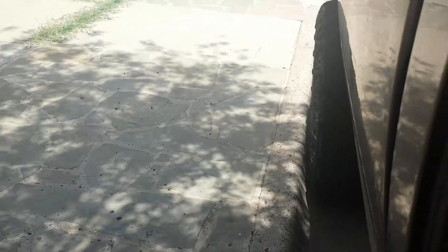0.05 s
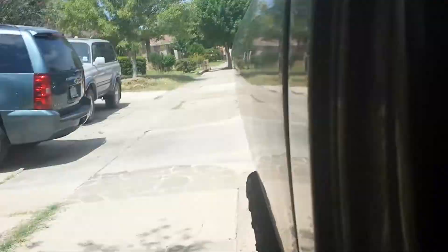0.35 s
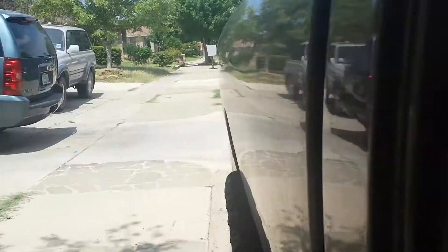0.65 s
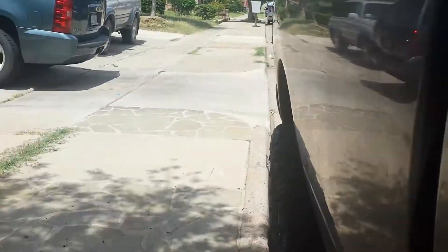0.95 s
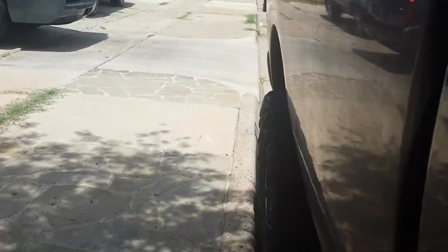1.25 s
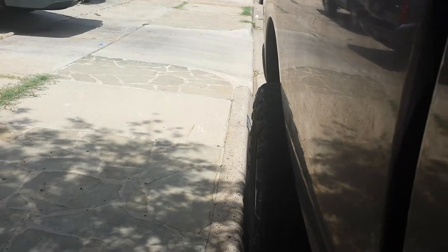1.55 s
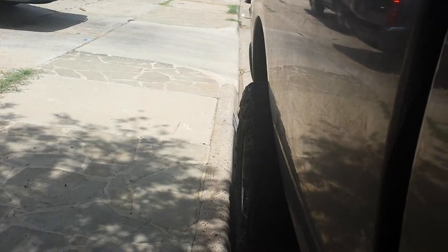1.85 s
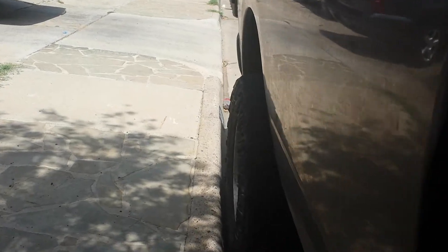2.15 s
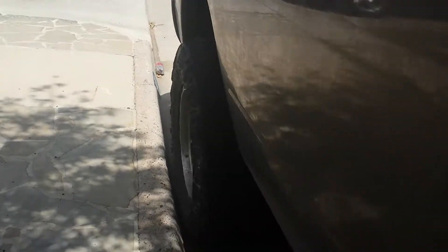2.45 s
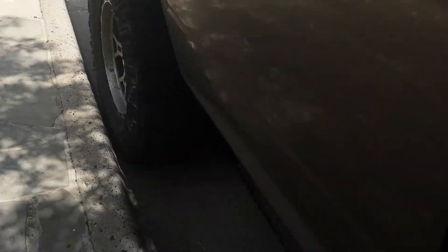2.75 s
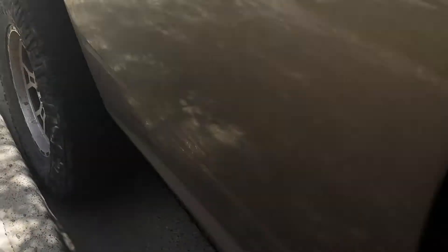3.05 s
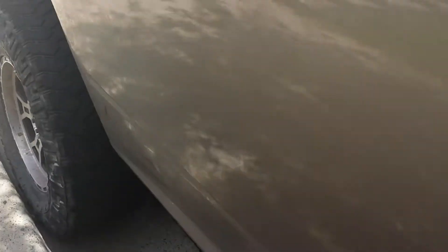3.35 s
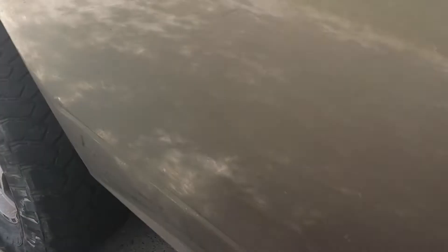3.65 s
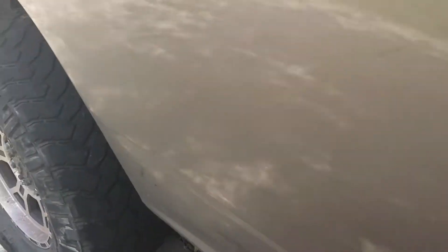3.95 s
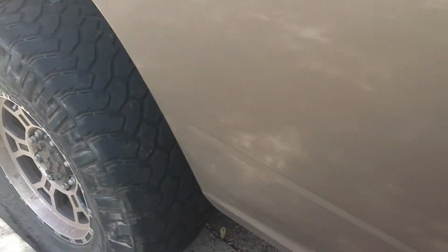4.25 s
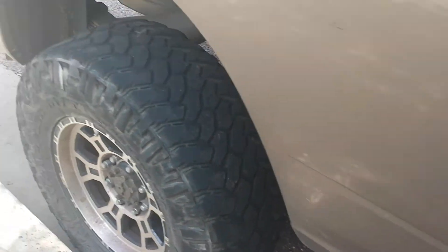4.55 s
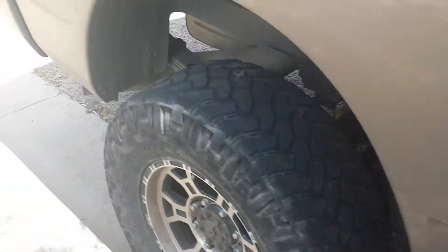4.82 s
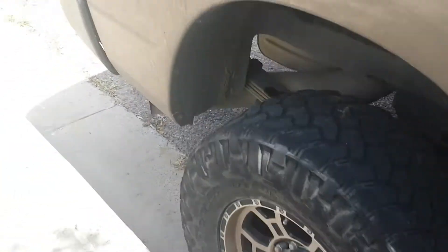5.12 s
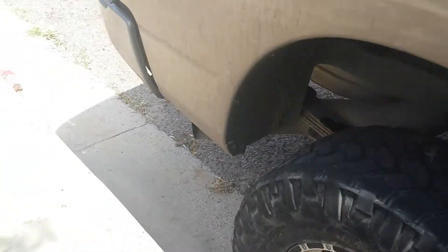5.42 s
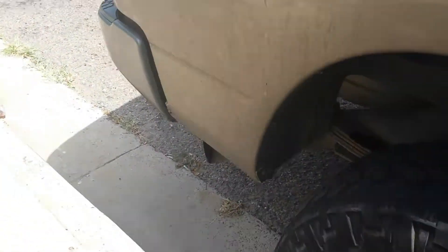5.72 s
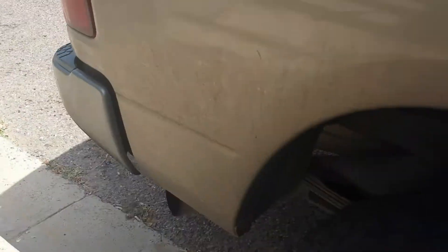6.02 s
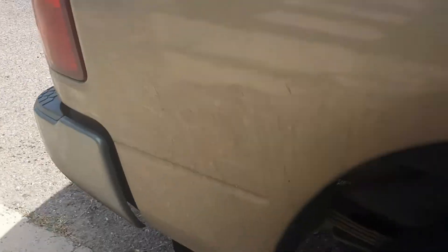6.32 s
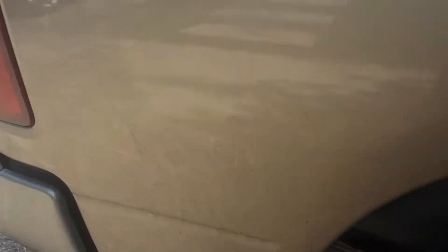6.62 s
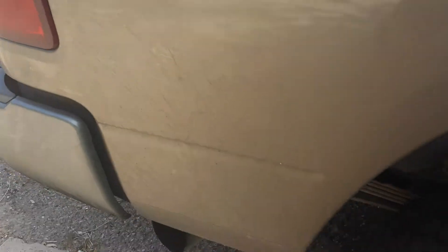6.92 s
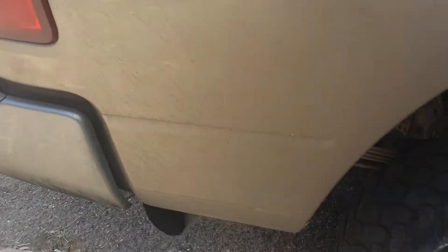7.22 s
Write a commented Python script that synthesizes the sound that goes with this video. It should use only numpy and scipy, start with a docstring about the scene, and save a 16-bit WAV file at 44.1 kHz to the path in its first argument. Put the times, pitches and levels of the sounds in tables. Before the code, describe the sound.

A diesel pickup idles outdoors at a curb with a deep, lumpy exhaust boom. After about two seconds the exhaust brake closes, the boom thins to a drone, and a bright hiss comes in with a rising, fluttering turbo whistle. The sound dips for a second as the hand-held microphone moves along the side toward the tailpipe. Light wind rumbles on the microphone, with a few tiny ticks.

```python
"""A six-cylinder turbo-diesel pickup idles while a hand-held phone is carried from cab to tailpipe.
The engine's firings ring the exhaust pipe with a lumpy boom. Then the exhaust brake closes: the boom
thins to a drone, gas hisses through the narrowed vanes and the turbo spins up to a whistle.
The sound dips for a second along the truck's side. Wind rumbles on the phone's microphones,
and a few sharp ticks on the phone make its limiter turn the sound down for a moment."""
import sys
import numpy as np
from scipy import signal
from scipy.fft import rfft, irfft, next_fast_len
from scipy.io import wavfile
from scipy.ndimage import uniform_filter1d, minimum_filter1d

SR = 44100
rng = np.random.default_rng(int(sys.argv[2]) if len(sys.argv) > 2 else 0)


def generate_wav(sig):
    """Save sig (samples, or channels by samples) to the path in sys.argv[1] as 16-bit PCM at SR."""
    pcm = np.round(np.clip(np.atleast_2d(sig).T, -1, 1) * 32767).astype(np.int16)
    wavfile.write(sys.argv[1], SR, pcm)


N = 325458
TIME = np.arange(N) / SR
IDLE_HZ, SAG_HZ = 39.93, 2.3  # firings a second at idle; how hard the brake pulls that rate down


def undb(db):
    """Turn decibels into a gain."""
    return 10 ** (np.asarray(db) / 20)


def curves(table):
    """Join a table's timed points into one curve per column."""
    times, *columns = np.transpose(table)
    return [np.interp(TIME, times, column) for column in columns]


def since(start_s):
    """Seconds gone by since a moment; zero before it."""
    return np.maximum(TIME - start_s, 0)


def ramp(start_s, length_s):
    """Rise evenly from 0 to 1."""
    return np.minimum(since(start_s) / length_s, 1)


def ease(x):
    """Bend a ramp so it starts fast and settles gently."""
    return 1 - (1 - x) ** 2


def walk(rate_hz):
    """A smooth random wander with a spread of 1."""
    step = max(int(SR / rate_hz), 2)
    held = rng.standard_normal(4096)[np.arange(N) // step]
    smooth = uniform_filter1d(uniform_filter1d(held, step), step)
    return smooth / np.std(smooth)


def pan(side_db):
    """Left and right gains that differ by side_db and average 1."""
    gains = undb(np.array([side_db, -side_db]) / 2)
    return gains / gains.mean(axis=0)


def cut_bass(x, hz, order):
    """Weaken everything below a frequency."""
    return signal.sosfilt(signal.butter(order, hz, "high", fs=SR, output="sos"), x)


def colour(x, hz, db):
    """Make each frequency louder or softer, following a curve."""
    size = next_fast_len(N + SR // 2, real=True) // 2 * 2
    freqs = np.maximum(np.arange(size // 2 + 1) * SR / size, 1)
    gain = undb(np.interp(np.log(freqs), np.log(hz), db))
    # folding the cepstrum makes the filter ring after a pulse, never before it
    cepstrum = irfft(np.log(gain))
    cepstrum[1:size // 2] *= 2
    cepstrum[size // 2 + 1:] = 0
    return irfft(rfft(x, size) * np.exp(rfft(cepstrum)))[..., :N]


def unit(x, band_hz):
    """Scale a sound so the average of its channels has strength (rms) 1 within a band."""
    mid = np.atleast_2d(x).mean(axis=0)
    return x / np.std(signal.sosfilt(signal.butter(4, band_hz, "band", fs=SR, output="sos"), mid))


def air(apart_hz, width=1):
    """Stereo noise: the bass is alike at both microphones, the treble differs."""
    mid, side = rng.standard_normal((2, N))
    side = width * cut_bass(side, apart_hz, order=1)
    return np.array([mid + side, mid - side])


def wind(steady_db):
    """Moving air rumbles on the microphones, with thumping gusts near the back of the truck."""
    # tone of the rumble: (frequency [Hz], level [dB])
    tone = [(20, -12), (50, -14.5), (80, -2.5), (110, -3), (150, -4.5), (300, -18), (700, -35.5)]
    # gusts on the phone: (time [s], length [s], level [dB])
    gusts = [(4.896, 0.18, -39), (5.494, 0.24, -38), (5.776, 0.094, -26), (6.803, 0.2, -33.5),
             (7.283, .08, -32.5)]
    swell = sum(undb(db) * np.exp(-(2 * (TIME - s) / length) ** 2) for s, length, db in gusts)
    rumble = unit(colour(air(apart_hz=230), *np.transpose(tone)), (55, 130))
    return np.hypot(undb(steady_db), swell) * rumble


def ticks(decay_s=.0003, crack=.8):
    """Tiny ticks on the phone, each a ring and a crack, hard enough to overload the microphones."""
    # ticks: (time [s], level [dB], ring [Hz], left minus right [dB])
    hits = [(.7255, 3.5, 15800, -12), (3.4533, 7, 3500, 1), (6.1802, 3, 15800, -10)]
    out, t = np.zeros((2, N)), np.arange(SR // 200) / SR
    for s, db, hz, side_db in hits:
        tick = np.cos(2 * np.pi * hz * t) + crack * rng.standard_normal(len(t))
        tick *= np.exp(-t / decay_s)
        overloaded = np.outer(pan(side_db), np.tanh(2 * tick))
        start = int(s * SR)
        out[:, start:start + len(t)] += undb(db) * overloaded / np.abs(overloaded).max()
    return out


def turbo_whistle(idle_hz=2350, full_hz=3543, wobble_hz=3, flutter=.55, flutter_hz=50, fade_db=2):
    """The turbo whistles as its shaft spins up; swirling gas makes each tone flutter and fade."""
    # the lowest tone as it beams at the moving phone: (time [s], left [dB], right [dB])
    beam = [(1.86, -33.5, -33.5), (2.42, -26.5, -23), (2.72, -24, -23.5), (2.84, -22, -38),
            (3.46, -14.5, -27), (3.62, -32, -29), (3.8, -20, -24), (4.52, -26.5, -37), (4.7, -21.5, -25),
            (5.1, -20.5, -26), (5.27, -39, -38), (5.42, -26, -17.5), (5.7, -23.5, -21), (5.84, -29.5, -29),
            (6.42, -37, -28.5), (6.66, -24.5, -35), (7.0, -35, -30.5), (7.34, -31, -20)]
    # higher tones: (multiple of the shaft rate, level change [dB], left minus right [dB])
    overtones = [(2, 0.5, -3), (3, 0, 0), (4, -4, 0)]
    # how much of them the pipe lets out: (frequency [Hz], level [dB])
    outlet = [(4700, -47), (5700, -27), (6500, -22), (6950, -21), (8100, -20.5), (8700, -33), (10200, -31),
              (13500, -43)]
    start_s, spin_up_s, spin_lag_s = 1.834, 2.048, 1.766
    shaft_hz = idle_hz + (full_hz - idle_hz) * (1 - np.exp(-since(spin_up_s) / spin_lag_s))
    phase = 2 * np.pi * np.cumsum(shaft_hz + wobble_hz * walk(45)) / SR
    tones = [(.99, undb(curves(beam)) * ramp(start_s, length_s=.086))]  # just under the shaft rate
    for multiple, trim_db, side_db in overtones:
        db = np.interp(multiple * shaft_hz, *np.transpose(outlet)) + trim_db
        tones.append((multiple, np.outer(pan(side_db), undb(db) * ramp(start_s, length_s=.62))))
    out = 0
    for multiple, gain in tones:
        rate = flutter_hz * np.sqrt(multiple)  # the hot jet scatters shorter waves faster
        paths = np.array([1 + flutter * (walk(rate) + 1j * walk(rate)) for _ in range(2)])
        tone = np.sqrt(2 / (1 + 2 * flutter ** 2)) * np.real(paths * np.exp(1j * multiple * phase))
        out = out + gain * undb(fade_db * walk(12)) * tone
    return out


def blend(closed, wheel, tail):
    """Shares of four states: brake open, then closed and heard at the cab, wheel and tailpipe."""
    return np.array([1 - closed, closed * (1 - wheel),
                     closed * wheel * (1 - tail), closed * wheel * tail])


def flow(table, shares, gas, band_hz):
    """Give gas noise the tone of each state and mix them by their shares of the power."""
    hz, *tones = np.transpose(table)
    return sum(np.sqrt(share) * unit(colour(gas, hz, db), band_hz) for share, db in zip(shares, tones))


def pipe_echo(x, lag_s, gain):
    """The pipe's open end sends back an upside-down echo, which makes the gas sound hollow."""
    return x - gain * np.roll(x, int(lag_s * SR), axis=-1)


def knock(firings, decay=.45, scatter_db=3):
    """Burning fuel gives an uneven jump in level at each firing; decay is a share of the gap."""
    sizes = undb(scatter_db * rng.standard_normal(512))
    return sizes[firings.astype(int)] * np.exp(-(firings % 1) / decay)


def clatter(firings, cylinders=6):
    """The engine noise that comes back alike each time all cylinders have fired."""
    pattern = rng.standard_normal(int(cylinders * SR / IDLE_HZ))
    return pattern[(firings / cylinders % 1 * len(pattern)).astype(int)]


def vane_hiss(beat, shares):
    """Gas jets through the brake's vanes with a bright hiss that pulses with the engine."""
    # tone of the hiss: (frequency [Hz], brake open [dB], closed at cab [dB], wheel [dB], tailpipe [dB])
    tone = [(1410, -79.5, -82.5, -89, -75.5), (2470, -67.5, -59, -64.5, -73),
            (2580, -69, -56.5, -66.5, -64), (3050, -67, -57, -66.5, -70.5), (3350, -68, -58.5, -65, -68.5),
            (4360, -71.5, -58.5, -64.5, -64.5), (4900, -69.5, -53.5, -69, -58.5),
            (5810, -69.5, -56.5, -60, -65), (5930, -66.5, -53, -59.5, -61),
            (7630, -68.5, -52, -56.5, -55.5), (7500, -64.5, -46, -53, -60), (8370, -70, -51.5, -60.5, -59),
            (10200, -75, -56, -63.5, -64.5), (11200, -75.5, -56.5, -67.5, -68),
            (16800, -76.5, -53.5, -78, -60)]
    gas = pipe_echo(air(apart_hz=490), lag_s=.00205, gain=.15) * (1 + .42 * beat)
    return flow(tone, shares, gas, (7200, 14000))


def gas_rush(firings, beat, shares, tail):
    """Gas rushes down the pipe with the engine's clatter, sounding hollow close to the mouth."""
    # tone of the rush: (frequency [Hz], brake open [dB], closed at cab [dB], wheel [dB], tailpipe [dB])
    tone = [(25, -91, -76, -80, -80), (73, -45.5, -59, -70, -63), (142, -25, -36, -62, -83),
            (265, -54, -56, -51, -74), (486, -56, -62, -62.5, -66), (790, -61.5, -65.5, -55, -69.5),
            (960, -62, -64, -59, -67), (1190, -62.5, -62, -61, -67), (1286, -60, -63.5, -51.5, -53.5),
            (1345, -65.5, -60, -62.5, -57), (1660, -64, -59, -70, -62.5), (1634, -62.5, -71, -59.5, -65.5),
            (2045, -68.5, -61.5, -64, -65.5), (2920, -89, -74, -82.5, -78.5)]
    gas = air(apart_hz=1250, width=1.55) + clatter(firings)
    gas = pipe_echo(gas, lag_s=.00179, gain=.24 * tail) * (1 + .5 * beat)
    gas = cut_bass(gas, hz=225, order=4)  # the narrow mouth lets out little of the gas's bass
    return flow(tone, shares, gas, (350, 2000))


def crankshaft(load_s=1.78, sag_s=.17, recover_s=1.35):
    """Count the firings so far; the brake slows the engine and its governor brings the speed back."""
    t = since(load_s)
    hz = IDLE_HZ - SAG_HZ * (1 - np.exp(-t / sag_s)) * np.exp(-t / recover_s)
    return 1.66 + np.cumsum(hz * (1 + .001 * walk(14))) / SR


def ring_pipe(firings, hz, db, unevenness, scatter_db):
    """Front and rear cylinders take turns, so unequal pairs of firings ring the pipe."""
    # the three pairs in an engine cycle, before scaling by unevenness: (level [dB])
    pair_db = [.7, -1, .3]
    sizes = undb(unevenness * np.resize(pair_db, 256) + scatter_db * rng.standard_normal(256))
    starts = np.flatnonzero(np.diff(np.floor(firings / 2)))  # one pulse per pair
    pulses = np.zeros(N)
    pulses[starts] = sizes[:len(starts)]
    return unit(colour(pulses, np.append(hz, SR / 8), np.append(db, -110)), (135, 270))


def exhaust_note(firings, closed, wheel):
    """The pipe booms, then drones as pressure behind the closed brake evens out the cylinders."""
    # tone of the pipe:
    # (multiple of half the firing rate, brake open [dB], closed at cab [dB], closed at tailpipe [dB])
    tone = [(1, -31, -54, -36), (2, -27, -15, -28), (3, -16.5, -33, -31), (4, -3.5, -5, -12),
            (5, 2.5, -20, -5.5), (6, -16.5, -7, -12.5), (7, 3.5, -5.5, -12), (8, -22.5, -2, 2.5),
            (9, -19, 8.5, 2.5), (10, -27.5, -14, -16), (11, -4, -19, -19), (12, -20.5, -34, -37),
            (13, -10, -10, -12), (14, -25, -14.5, -18), (16, -31, -12.5, -28), (18, -27, -46, -17.5),
            (22, -33.5, -41, -38.5), (30, -40, -21, -24), (45, -93, -36, -43.5)]
    multiples, open_db, cab_db, tail_db = np.transpose(tone)
    idle_hz, loaded_hz = multiples * IDLE_HZ / 2, multiples * (IDLE_HZ - SAG_HZ / 2) / 2
    boom = ring_pipe(firings, idle_hz, open_db, unevenness=1.8, scatter_db=.45)
    at_cab = ring_pipe(firings, loaded_hz, cab_db, unevenness=.4, scatter_db=.35)
    at_tail = ring_pipe(firings, idle_hz, tail_db, unevenness=.4, scatter_db=.35)
    drone = (1 - wheel ** 2) * undb(-3) * at_cab + wheel ** 2 * at_tail
    return (1 - closed) * boom + ease(closed) * drone


def scene():
    """Mix the truck, wind and ticks as the brake closes and the phone moves."""
    # the phone's path: (time [s], way from cab to rear wheel [0-1], way on to the tailpipe [0-1])
    path = [(3.4, 0.17, 0), (4.4, 0.73, 0), (5.2, 0.87, 0.04), (5.8, 0.93, 0.36), (6.5, 1, 0.81),
            (7.0, 1, 0.98)]
    # levels, a row for each state in blend():
    # (pipe note [dB], rush [dB], hiss [dB], wind [dB], hiss left minus right [dB])
    levels = [(-18.5, -29.5, -34, -31.5, -1), (-18.5, -28, -21, -36.5, 2.3), (-29.5, -32.5, -24, -35, 0),
              (-39, -35.5, -24.5, -40.5, 0.9)]
    # small swings in level as the phone moves: (time [s], pipe note [dB], hiss [dB])
    sway = [(0.1, 2.5, 0), (0.9, -1, -1), (1.8, 1, -0.5), (2.6, -1, -1), (3.4, 0, 1), (4.7, 3, 0),
            (5.05, -2.5, 1), (6.12, 1, 1), (6.27, 2, -1), (6.85, -5, 0.5), (7.3, 0, 4.5)]
    firings = crankshaft()
    closed = ramp(start_s=1.804, length_s=.46)  # the brake's travel
    wheel, tail = curves(path)
    shares = blend(closed, wheel, tail)
    jet_shares = blend(ease(closed), wheel, tail)  # the jet forms early in that travel
    note_db, rush_db, _, wind_db, side_db = np.transpose(levels) @ shares
    hiss_db = np.transpose(levels)[2] @ jet_shares
    note_sway, hiss_sway = curves(sway)
    note = undb(note_db + note_sway) * exhaust_note(firings, closed, wheel)
    beat = knock(firings) * (1 - .8 * closed)  # the closed brake steadies the flow
    rush = undb(rush_db) * gas_rush(firings, beat, shares, tail)
    hiss = vane_hiss(beat, jet_shares) * undb(hiss_db + hiss_sway + .5 * walk(20)) * pan(side_db)
    whistle = turbo_whistle()
    # all but the ticks dips along the truck's side
    dip_db = -11.5 * (ease(ramp(start_s=3.407, length_s=.31)) - ramp(start_s=4.217, length_s=.45))
    return ticks() + undb(dip_db) * (note + rush + hiss + whistle + wind(wind_db))


def limiter(x, ceiling, ahead_s, hold_s):
    """Look ahead, turn the sound down before a peak and let go soon after it."""
    ahead, hold = int(ahead_s * SR), int(hold_s * SR)
    safe_gain = np.minimum(1, ceiling / np.maximum(np.abs(x).max(axis=0), 1e-9))
    span = ahead + hold
    gain = np.roll(minimum_filter1d(safe_gain, span), hold - span // 2)
    return x * uniform_filter1d(gain, hold)


def record(dry):
    """The phone dulls its left side and loses a little bass there, limits peaks and cuts top treble."""
    # tone of the left microphone: (frequency [Hz], level [dB])
    left_tone = [(400, 0), (1400, -1.5), (3000, 0), (6400, -2.5), (7200, -3), (8200, -10), (9500, -10.5),
                 (11000, -24.5), (14500, -34.5)]
    left = cut_bass(colour(dry[0], *np.transpose(left_tone)), hz=24, order=1)
    limited = limiter(np.array([left, dry[1]]), ceiling=.98, ahead_s=.022, hold_s=.007)
    top_hz = 14750
    return signal.sosfilt(signal.ellip(12, .2, 80, top_hz, fs=SR, output="sos"), limited)


dry = scene()
out = record(dry)
generate_wav(out)
```